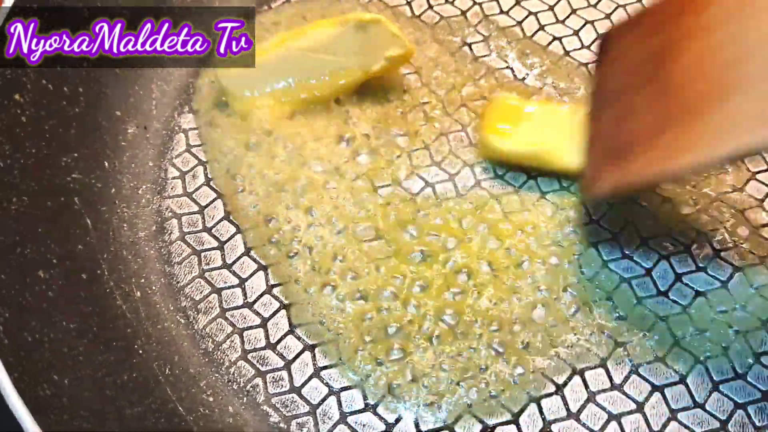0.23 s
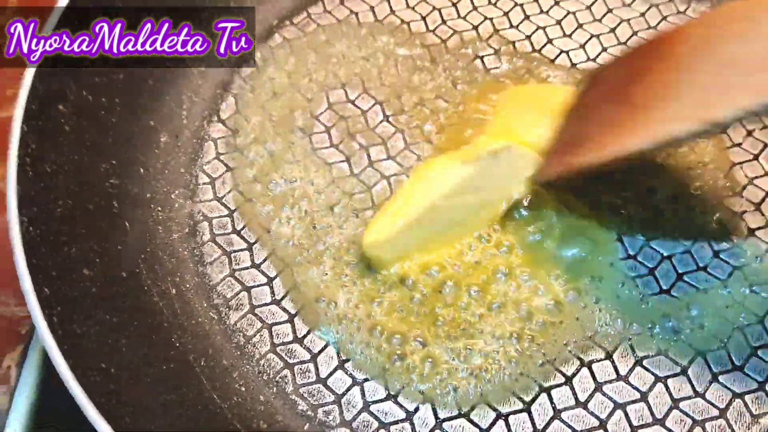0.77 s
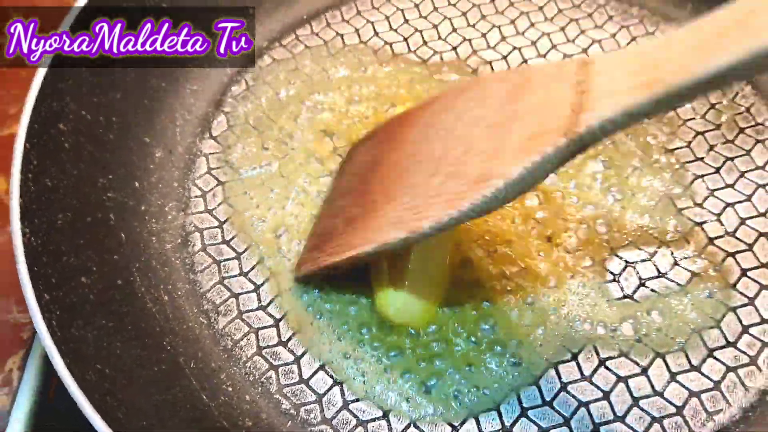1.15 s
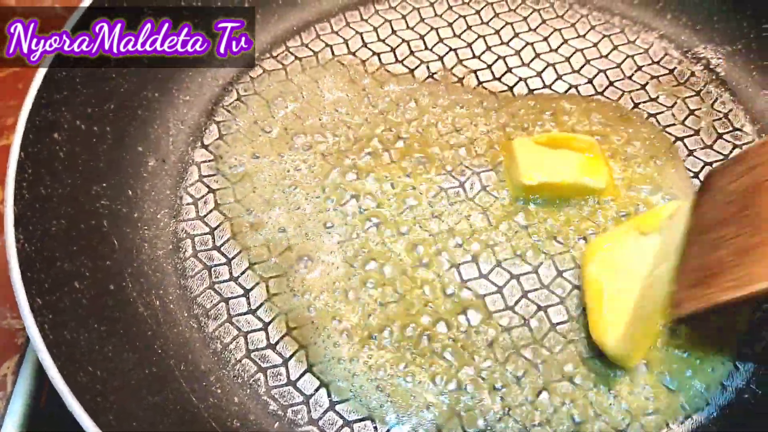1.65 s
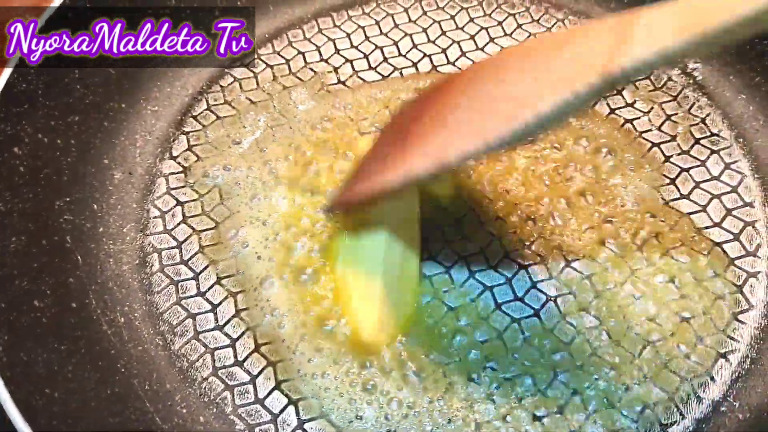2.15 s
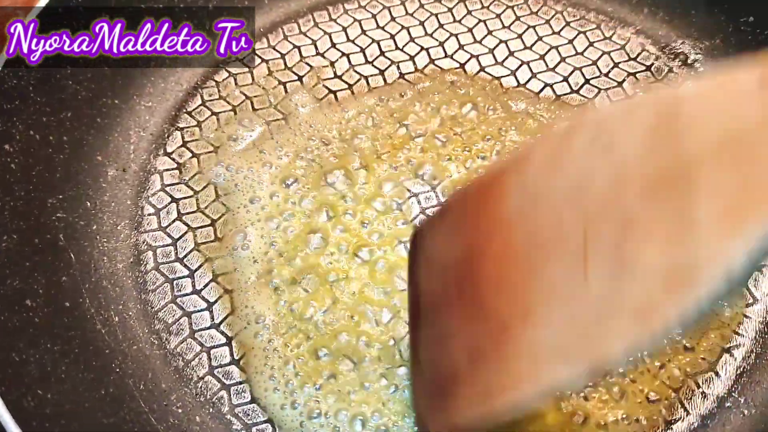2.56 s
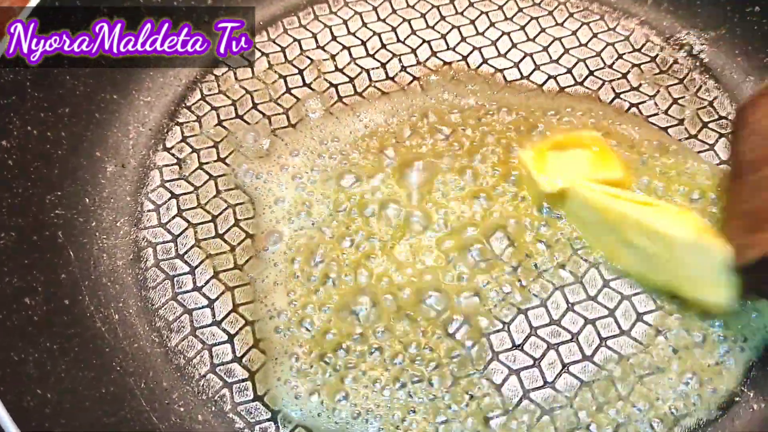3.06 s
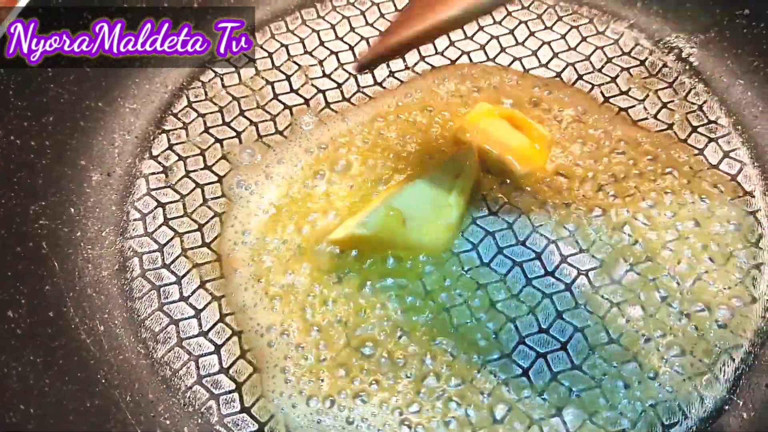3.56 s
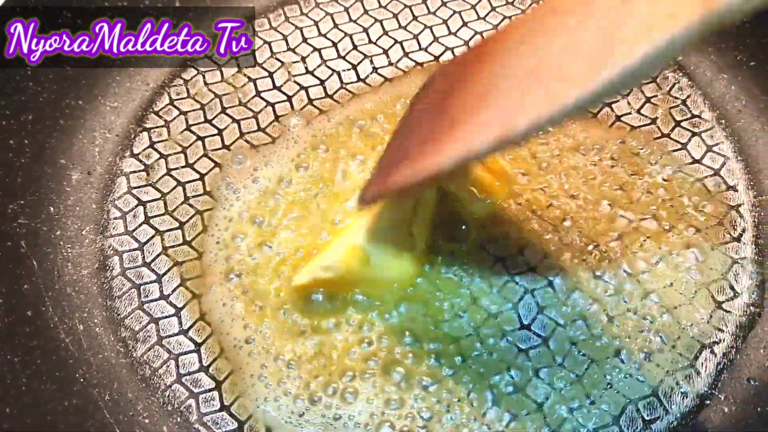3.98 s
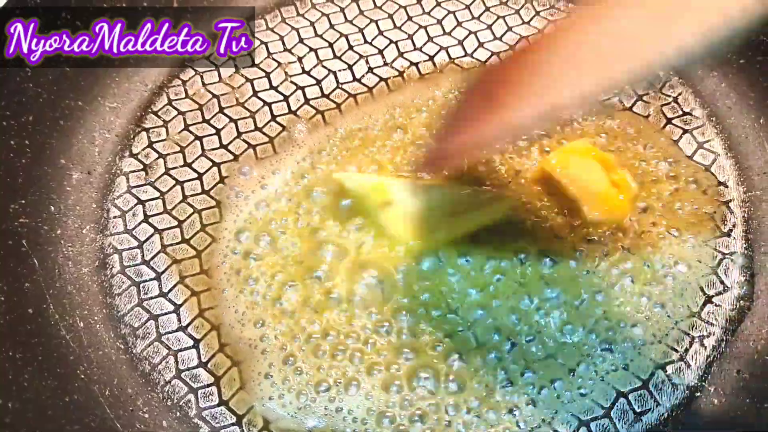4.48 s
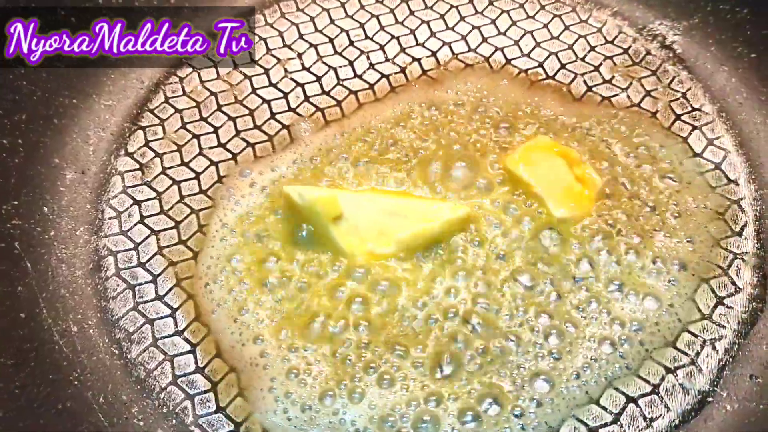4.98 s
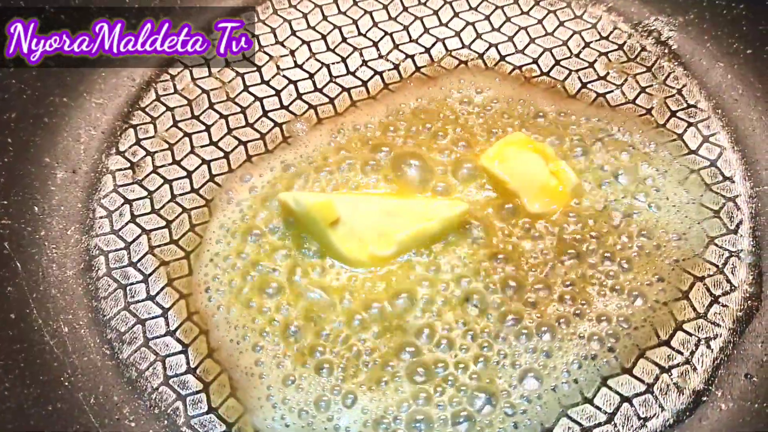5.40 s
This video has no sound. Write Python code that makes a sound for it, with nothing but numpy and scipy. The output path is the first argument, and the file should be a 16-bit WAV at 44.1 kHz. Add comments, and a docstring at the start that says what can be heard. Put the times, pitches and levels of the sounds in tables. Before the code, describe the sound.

Close to the microphones, melting butter hisses and crackles in a frying pan as a wooden spatula drags through it, making the pan ring faintly. Sharp pops break out, then comes one dull knock and a short, faint falling tone. More light scrapes follow while the frying gradually eases, ending with a quick, quiet rasp in the room. A low kitchen hum lies underneath.

```python
"""Butter melts and sizzles in a hot pan, close to two microphones behind small ports that lift the treble.
From the start, water boils out of the fat as countless bursting bubbles over a kitchen's low drone,
and a wooden spatula pushes the butter about, its friction exciting the pan's resonances. From 0.7 s
single bubbles pop loudly. At 1.2 s the spatula knocks the pan once, and a short low moan follows.
The sizzle slowly calms, and at 5.4 s a brief rasp sounds in the room."""
import sys
import numpy as np
from scipy import signal
from scipy.fft import rfft, irfft
from scipy.io import wavfile
from scipy.ndimage import uniform_filter1d

SR = 44100
rng = np.random.default_rng(int(sys.argv[2]) if len(sys.argv) > 2 else 0)


def master_out(mix):
    """Clip the mix to full scale and print it as 16-bit PCM to the path in sys.argv[1]."""
    frames = np.transpose(np.atleast_2d(mix))
    ceiling = np.clip(frames, -1, 1)
    pcm = np.round(ceiling * 32767).astype(np.int16)
    wavfile.write(sys.argv[1], SR, pcm)


N = 248283

# Frequency response of each microphone port to the sizzle. Each row: frequency in Hz, gain in dB.
LEFT_PORT = [(300, -56), (900, -30), (1700, -19.2), (2400, -15.0), (3200, -11.6), (4200, -12.2),
             (5000, -12.8), (5600, -10.5), (5900, -9.0), (6400, -2.8), (6800, 0.0), (7300, -2.0),
             (8200, -5.0), (9500, -8.6), (11500, -10.1), (13500, -8.4), (14600, -4.0), (15400, -1.7),
             (15520, -1.7)]
RIGHT_PORT = [(300, -56), (900, -30), (1700, -18.2), (2400, -15.3), (3200, -11.8), (4200, -12.8),
              (5000, -13.8), (5900, -13.0), (6400, -10.0), (6800, -7.4), (7300, -6.6), (8200, -9.8),
              (9500, -13.7), (11500, -14.2), (13500, -17.6), (14600, -17.0), (15400, -16.6), (15520, -16.6)]
# Spatula strokes. Each row: end in seconds, length in seconds, rub level in dB, lift of the froth in dB.
STROKES = [(0.727, 1.7, -52, 0.5), (1.283, 0.23, -47, 0.5), (1.838, 0.32, -39.5, 1),
           (2.192, 0.3, -47.5, 0.5), (2.86, 0.19, -43.5, 4), (3.546, 0.11, -49, 2.5), (4.32, 0.19, -57, 2)]


def amp(db):
    """Amplitude ratio of a level in decibels."""
    return 10 ** (np.asarray(db) / 20)


def unit_rms(x):
    """Normalisation: the mean of the channels gets rms 1."""
    return x / np.sqrt(np.mean(np.atleast_2d(x).mean(0) ** 2) + 1e-20)


def spectrum(points, hz):
    """Interpolation of a spectrum table on a log-frequency axis."""
    f, value = np.transpose(points)
    return np.interp(np.log(hz + 1), np.log(f + 1), value)


def curve(rows, t):
    """Linear interpolation of each column of a time table."""
    s, *columns = np.transpose(rows)
    return [np.interp(t, s, c) for c in columns]


def swell(t, start, rise, hold, fall):
    """Trapezoidal envelope from 0 to 1 and back; times in seconds."""
    return np.clip(np.minimum((t - start) / rise, (start + rise + hold + fall - t) / fall), 0, 1)


def wander(hz):
    """Random modulation: noise of rms 1, low-passed at hz."""
    return unit_rms(signal.lfilter(*signal.butter(2, hz, fs=SR), rng.standard_normal(N + SR))[SR:])


def noise_pair(correlation):
    """Two partly correlated white noises."""
    a, b = rng.standard_normal((2, N))
    return np.array([a, correlation * a + np.sqrt(1 - correlation ** 2) * b])


def band(x, hz, width):
    """Second-order resonance of peak gain 1; width in Hz."""
    return signal.lfilter(*signal.iirpeak(hz, hz / width, SR), x)


def port(points):
    """Minimum-phase impulse response of a microphone port."""
    points = list(points) + [(16000, -45)]  # the treble is cut off steeply above 15.5 kHz
    log_gain = np.log(amp(spectrum(points, abs(np.fft.fftfreq(4096, 1 / SR)))))
    return np.fft.ifft(np.exp(np.conj(signal.hilbert(log_gain)))).real[:1024]


def snap(hz, cycles):
    """Damped oscillation of a bursting bubble: energy 1, falling to 1/e in the given cycles."""
    t = np.arange(256) / SR
    burst = np.sin(2 * np.pi * hz * t) * np.exp(-t * hz / cycles)
    return burst / np.linalg.norm(burst)


def bubbles(per_s, span_hz, cycles, spread_db, side_db, clump_db, spots):
    """Shot noise of clumped bursts; each spot in the pan has its own pitch, side and arrival gap."""
    clump = amp(clump_db * wander(60))
    size = amp(spread_db * np.minimum(rng.exponential(1, N), 3.5))
    size *= rng.random(N) < per_s * clump / SR
    size *= rng.choice([-1., 1.], N)
    spot, out = rng.integers(0, spots, N), np.zeros((2, N))
    for k, hz in enumerate(np.linspace(*span_hz, spots)):
        train = signal.oaconvolve(size * (spot == k), snap(hz, cycles))[:N]
        side, gap = side_db * (-1) ** k, rng.integers(-24, 24)
        out += [amp(side) * train, amp(-side) * np.roll(train, gap)]
    return unit_rms(out)


def reflections(x, echo_db, t60, spots):
    """Reflection from pan and walls adds a decaying tail, different for each spot and side."""
    t = np.arange(2600) / SR
    tails = rng.standard_normal((spots, 2, len(t))) * amp(-60 * t / t60) * (t > .0004)
    spot = np.repeat(rng.integers(0, spots, N // 256 + 1), 256)[:N]
    echo = sum(signal.oaconvolve(x * (spot == k), tail / np.linalg.norm(tail[0]), axes=1)[:, :N]
               for k, tail in enumerate(tails))
    return x + amp(echo_db) * echo


def hiss():
    """Countless tiny bubbles superpose into noise; a coherent part reaches the left microphone late."""
    left_delay_s = 0.0001
    hz = np.fft.rfftfreq(N, 1 / SR)
    own, right = rfft(noise_pair(0))
    shared = spectrum([(1200, 0.32), (4000, 0.62), (6500, 0.086)], hz)
    left = shared * right * np.exp(-2j * np.pi * hz * left_delay_s) + np.sqrt(1 - shared ** 2) * own
    return irfft(np.array([left, right]), N) * amp(0.84 * wander(14))


def boiling(calm_db):
    """Water vaporises in the fat; the calmer the pan, the less the hiss masks single bursts."""
    fine = bubbles(3500, (5300, 16200), cycles=1.8, spread_db=4.8, side_db=2.7, clump_db=2.2, spots=16)
    large = bubbles(500, (1946, 5334), cycles=6.8, spread_db=2.4, side_db=1, clump_db=2, spots=10)
    crackle = bubbles(150, (9900, 18000), cycles=1.8, spread_db=3.5, side_db=2.8, clump_db=1.7, spots=6)
    bursts = reflections(amp(0.71 * calm_db) * fine + amp(-6) * large, echo_db=0.5, t60=0.065, spots=5)
    at_ports = bursts + amp(-7 + 1.5 * calm_db) * crackle + amp(9) * hiss()
    ports = np.array([port(LEFT_PORT), port(RIGHT_PORT)])
    return unit_rms(signal.oaconvolve(at_ports, ports, axes=1)[:, :N])


def sizzle():
    """Boiling under a time-varying spectral envelope: fine spray is high, coarse froth lower."""
    # Course of the boil. Each row: time in seconds, level before shaping in dB, lift of the spray in dB.
    course = [(0.0, -21, 5.5), (0.08, -20.5, 4.5), (0.44, -22, 0.5), (1.07, -23.5, 1), (1.44, -27, 1),
              (1.74, -20.5, 0), (1.91, -23, -1), (2.16, -21.5, 0), (2.22, -27, 0.5), (2.33, -24, -0.5),
              (2.8, -25, 1), (2.89, -27, 0), (3.06, -26, 3), (3.59, -25, -.5), (4.0, -29, 2),
              (4.34, -30.5, -4), (4.61, -29, -1.5), (4.72, -25.5, -4.5), (4.84, -29, -3.5), (5.07, -28, -3),
              (5.63, -31, -3.5)]
    # Bands of the spray, the froth and the port peak. Each row: frequency in Hz, share of the lift.
    spray_band = [(8000, 0.18), (13000, 1)]
    froth_band = [(4500, 0.97), (6200, 0.17)]
    peak_band = [(6000, 0), (6600, 1), (7300, 1), (8200, 0)]
    # Emphasis around the port peak. Each row: time in seconds, lift in dB.
    peak_lift = [(0, 1), (1.5, 0.5), (2.3, 0), (3.0, 2), (3.6, 1.5), (4.3, 0), (4.7, 1.5), (5.63, -1)]
    level_db = curve(course, np.arange(N) / SR)[0]
    calm_db = uniform_filter1d(level_db.mean() - level_db, SR)
    surge_db = level_db - uniform_filter1d(level_db, SR // 2)
    hz, t, frames = signal.stft(boiling(calm_db) * amp(level_db), SR, nperseg=256)
    froth_db = -2 + sum(db * stroke_speed(t, end, length) for end, length, _, db in STROKES)
    froth_db -= 0.17 * np.interp(t * SR, np.arange(N), surge_db)  # froth follows quick surges only partly
    shape_db = np.outer(spectrum(spray_band, hz), curve(course, t)[1])
    shape_db += np.outer(spectrum(froth_band, hz), froth_db)
    shape_db += np.outer(spectrum(peak_band, hz), curve(peak_lift, t)[0])
    return signal.istft(frames * amp(shape_db), SR, nperseg=256)[1][:, :N]


def kitchen():
    """Low air noise, coherent between the microphones at long wavelengths, with faint wavering tones."""
    # Spectrum of the air noise. Each row: frequency in Hz, relative spectral density in dB.
    density = [(12, -59), (20, -35), (49, -15), (81, -19), (177, -12), (208, 2), (300, -2), (352, -4),
               (440, -5.5), (477, -4), (561, -7), (790, -8.5), (857, -8), (1260, -11.5), (2500, -22),
               (3250, -39), (5500, -120)]
    # Course of the air noise. Each row: time in seconds, level in dB.
    course = [(0.0, -43.5), (0.3, -47), (1.47, -45), (2.13, -46), (3.25, -46.5), (4.19, -43.5),
              (4.69, -44.5), (5.33, -42.5), (5.63, -44)]
    # Likeness of left and right. Each row: frequency in Hz, correlation from 0 to 1.
    correlation = [(60, .96), (200, .93), (350, .8), (700, .55), (1400, .2), (3000, 0)]
    # Hum tones. Each row: frequency in Hz, mean rms level in dB.
    hum = [(53, -68.5), (102, -71), (211, -59.5), (368, -59.5), (473, -61)]
    hz, t = np.fft.rfftfreq(N, 1 / SR), np.arange(N) / SR
    left, own = rfft(noise_pair(0))
    shared = spectrum(correlation, hz)
    right = shared * left + np.sqrt(1 - shared ** 2) * own
    air = irfft(np.array([left, right]) * amp(spectrum(density, hz)), N)
    tones = sum(amp(db + 1.2 * wander(3.2)) * np.sqrt(2) * np.sin(2 * np.pi * (f * t + rng.random()))
                for f, db in hum)
    return unit_rms(air) * amp(curve(course, t)[0]) + tones


def stroke_speed(t, end, length):
    """Relative speed of a stroke: the spatula accelerates, glides, then stops short."""
    rise = 0.47 * length
    return swell(t, end - length, rise, hold=length - rise, fall=0.013)


def rough_noise(bands, correlation, grit_db):
    """Forced resonance: noise of flickering level drives a few bands; rms 1."""
    grit = noise_pair(correlation) * amp(grit_db * wander(34))
    return unit_rms(sum(amp(db) / np.sqrt(width) * band(grit, hz, width) for hz, width, db in bands))


def spatula():
    """Sliding friction excites the pan's resonances; the lowest sings while the spatula drags flat."""
    # Pan resonances in strokes and in drags. Each row: frequency in Hz, width in Hz, relative level in dB.
    stroke_modes = [(840, 370, -1), (1060, 66, -10), (1280, 370, -1.5), (2160, 950, -5)]
    drag_modes = [(675, 42, -1), (600, 53, -12)]
    # Flat drags. Each row: start in seconds, hold in seconds, level in dB.
    drags = [(-.1, 0.14, -42.5), (0.15, 0.24, -46), (0.437, 0.056, -40.5), (0.552, 0.034, -41.5)]
    t = np.arange(N) / SR
    stroke_power = sum((amp(db) * stroke_speed(t, end, length)) ** 2 for end, length, db, _ in STROKES)
    ring_power = amp(-41 - 2 * t) ** 2  # between strokes the pan rings on softly
    rub = np.sqrt(stroke_power + ring_power) * rough_noise(stroke_modes, correlation=0.39, grit_db=1.83)
    drag_gain = np.max([amp(db) * swell(t, s, 0.078, hold, 0.087) for s, hold, db in drags], axis=0)
    return rub + drag_gain * rough_noise(drag_modes, correlation=0.92, grit_db=0.91)


def pops():
    """Impulse excitation: a loud bubble snaps at its pitch, then spatters for a few milliseconds."""
    # Loud bursts. Each row: time in seconds, direct peak at the left in dB, pitch in Hz,
    # left over right in dB.
    bursts = [(0.6649, -6, 9900, 11), (0.7507, -17, 4070, 2), (0.9418, -7.5, 12600, 12),
              (0.9984, -6.0, 8000, 14), (1.2408, -9, 7500, 6), (1.3857, -2.0, 6900, 12),
              (1.7726, -6.5, 6700, 7), (1.7938, -6.5, 7200, 13), (1.8052, -4.5, 13500, 12),
              (1.8722, -5.0, 13900, 13), (1.9017, -5.5, 8300, 11), (2.1309, -4.5, 8100, 9),
              (2.1829, -6.5, 12700, 7), (2.235, -12, 7100, 4), (2.3173, -4.5, 13600, 15),
              (2.3324, -3, 6400, 13), (2.3898, -6.5, 13000, 12), (2.3992, -6.0, 13600, 12),
              (2.5937, -9, 6900, 6), (2.7955, -5.5, 7060, 7), (2.8011, -5.5, 8900, 10),
              (2.8559, -6.5, 11000, 1), (2.8725, -6.0, 14100, 3), (3.0297, -8.5, 7400, 5),
              (3.1035, -11, 6900, 3), (3.1706, -8, 6800, 4), (3.4866, -21, 3800, 1), (3.5291, -10, 6700, 6),
              (3.5412, -10, 6900, 6), (3.5585, -10, 7300, 6), (3.5841, -7.5, 6900, 13),
              (3.7481, -7, 7700, 4), (3.8673, -11.5, 6800, 5), (3.9821, -9.0, 8600, 10),
              (4.0034, -9, 7000, 4), (4.0047, -7.5, 7200, 5), (4.01, -8.5, 7200, 5),
              (4.017, -7.0, 10000, 10), (4.0913, -11, 6800, 7), (4.1387, -14, 7900, 7),
              (4.1463, -9.0, 8200, 16), (4.1593, -8.5, 13500, 10), (4.222, -14, 6900, 7),
              (4.2468, -9.0, 6400, 7), (4.374, -11, 11800, 6), (4.4001, -14.5, 6500, 5),
              (4.4245, -10.5, 6800, 7), (4.448, -11.5, 8000, 6), (4.459, -11, 6300, 5),
              (4.488, -11, 6900, 5), (4.5143, -11, 6500, 7), (4.526, -11, 7400, 6),
              (4.5508, -10.5, 6900, 7), (4.558, -9.0, 7300, 12), (4.5703, -3.0, 13300, 16),
              (4.617, -20, 4340, 1), (4.6421, -12, 6700, 4), (4.7179, -11.5, 6900, 5),
              (4.7212, -9.5, 11400, 11), (4.7553, -8.5, 6700, 10), (4.8248, -10, 9300, 15),
              (4.9031, -11.5, 7800, 6), (4.9723, -8.5, 9300, 10), (5.0327, -11, 7200, 8),
              (5.0547, -7.5, 7000, 6), (5.0562, -9, 7600, 6), (5.0704, -12.0, 6600, 8),
              (5.0611, -13, 12000, 8), (5.1108, -14, 10000, 6), (5.1175, -14, 6900, 6),
              (5.1304, -11, 13000, 3), (5.2162, -17, 6750, 5), (5.2327, -10, 7200, 3),
              (5.2545, -12, 15000, 12), (5.2694, -9, 11900, 10), (5.278, -13, 11500, 9),
              (5.298, -9, 14000, 6), (5.3591, -5.0, 13200, 12), (5.3731, -11, 7300, 0),
              (5.395, -14, 8000, 5), (5.4078, -28, 2900, 0), (5.4642, -8, 11900, 6), (5.5134, -13, 6000, 3),
              (5.5605, -15, 6800, 5), (5.531, -15, 10500, 8), (5.6175, -9, 10400, 6)]
    out, t = np.zeros((2, N + 1000)), np.arange(300) / SR
    ports = port(LEFT_PORT), port(RIGHT_PORT)
    spatters = rng.standard_normal((len(bursts), 2, len(t)))
    for (s, peak_db, hz, side_db), spatter in zip(bursts, spatters):
        for mic in (0, 1):
            kick = .17 * spatter[mic] * np.exp(-t / .0012)
            kick[0] = 1
            burst = np.convolve(kick, snap(hz, cycles=(11000 / hz) ** 0.8))
            heard = np.convolve(burst, ports[mic][:200])
            at = round(s * SR) - abs(heard).argmax()
            out[mic, at:at + len(heard)] += heard / abs(heard).max() * amp(peak_db - mic * side_db)
    return reflections(out[:, :N], echo_db=-16, t60=0.035, spots=2)


def knock():
    """Free vibration of damped modes after the spatula taps the pan."""
    # Modes of the knock. Each row: frequency in Hz, relative level in dB, time to fall 60 dB in seconds.
    modes = [(231, 6, 0.035), (333, 5, 0.043), (680, 11, 0.031), (800, 8, 0.041), (885, -5, 0.026),
             (1120, 1, 0.031)]
    start_s, peak_db = 1.2355, -19.5
    t = np.maximum(np.arange(N) / SR - start_s, 0)
    ring = sum(amp(db - 60 * t / t60) * np.sin(2 * np.pi * hz * t) for hz, db, t60 in modes)
    ring *= 1 - np.exp(-t / 0.001)  # soft wood takes a moment to bite
    ring = signal.lfilter(*signal.butter(2, 130, "high", fs=SR), ring)
    return amp(peak_db) * ring / abs(ring).max()


def gliding_band(x, hz, width):
    """Heterodyne resonance: shifts the curve hz down to zero, smooths, and shifts back."""
    carrier = np.exp(2j * np.pi * np.cumsum(hz) / SR)
    pole = np.exp(-np.pi * width / SR)
    return 2 * (carrier * signal.lfilter([1 - pole], [1, -pole], x / carrier)).real


def moan():
    """Frequency modulation: a tone in noise sinks as it swells, with a rough band just above it."""
    gain = swell(np.arange(N) / SR, start=1.36, rise=0.116, hold=0.077, fall=0.065) ** 2
    hz = 330.6 - 45 * gain
    a, b = rng.standard_normal((2, N))
    tone = amp(-0.5) * np.sqrt(2) * np.sin(2 * np.pi * np.cumsum(hz) / SR) * amp(3.6 * wander(25))
    halo = amp(-8) * unit_rms(gliding_band(a, hz, width=70))
    rough = amp(-2.5) * unit_rms(band(band(b, 346, width=50), 346, width=50))
    return (tone + halo + rough) * amp(-43.5) * gain


def rasp():
    """Narrow-band noise and jittering tones share one envelope: a brief rough sound in the room."""
    # Noise bands. Each row: frequency in Hz, width in Hz, relative level in dB.
    bands = [(480, 80, -2), (593, 59, 4), (1030, 79, 5), (1445, 45, 2), (1780, 80, 5), (1920, 60, -2),
             (2080, 60, 2), (2060, 60, -6), (2200, 60, -10)]
    # Clearer pitches. Each row: frequency in Hz, rms level at full swell in dB.
    pitches = [(495, -50.5), (593, -51), (1000, -50.5), (2041, -50)]
    gain = swell(np.arange(N) / SR, start=5.40, rise=0.048, hold=0.064, fall=0.15)
    tones = np.zeros(N)
    for hz, db in pitches:
        amplitude = np.sqrt(2) * amp(db + 2 * wander(20))
        tones += amplitude * np.sin(2 * np.pi * np.cumsum(hz + 8.7 * wander(15)) / SR)
    return gain * (amp(-39) * rough_noise(bands, correlation=0.15, grit_db=1.5) + tones)


def scene():
    """Superposition of all sources at the two microphones."""
    return sizzle() + pops() + spatula() + knock() + moan() + rasp() + kitchen()


def record(dry):
    """Band limiting by a steep linear-phase low-pass filter."""
    cutoff_hz = 15510
    low_pass = signal.firwin(2001, cutoff_hz, window=("kaiser", 9), fs=SR)
    return signal.oaconvolve(dry, low_pass[None], "same")


dry = scene()
out = record(dry)
master_out(out)
```